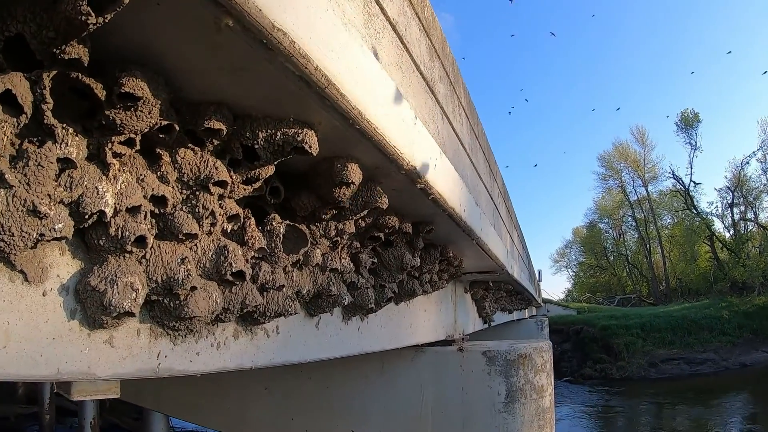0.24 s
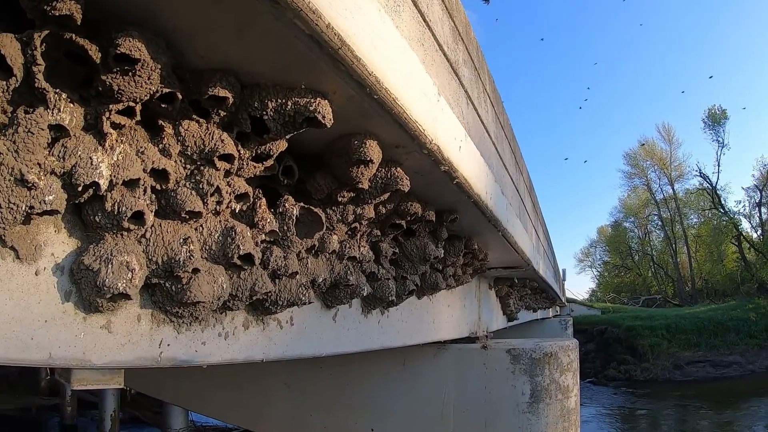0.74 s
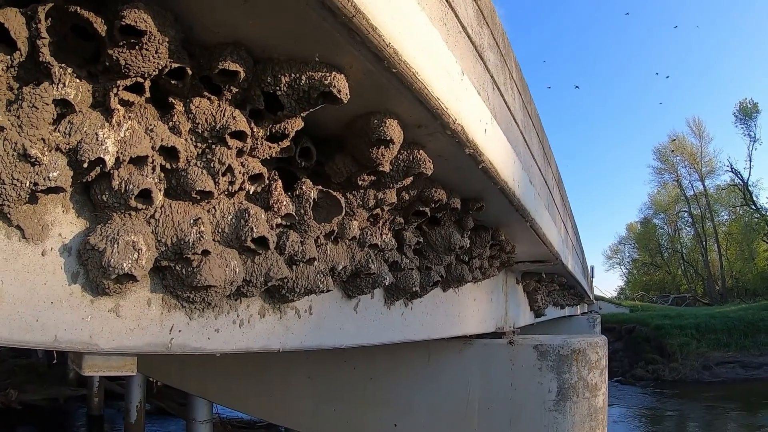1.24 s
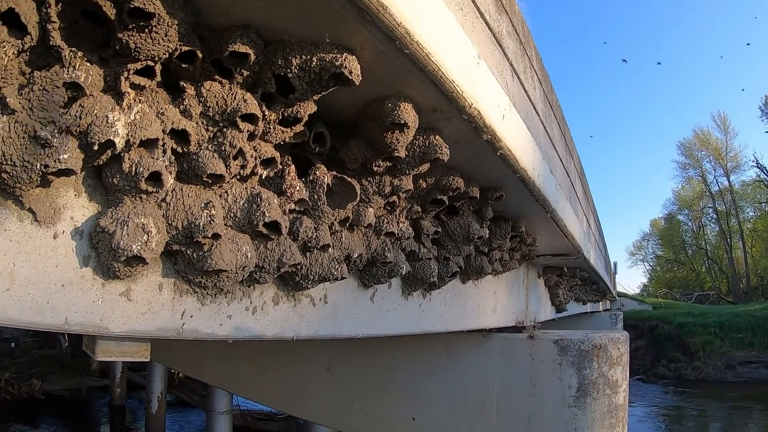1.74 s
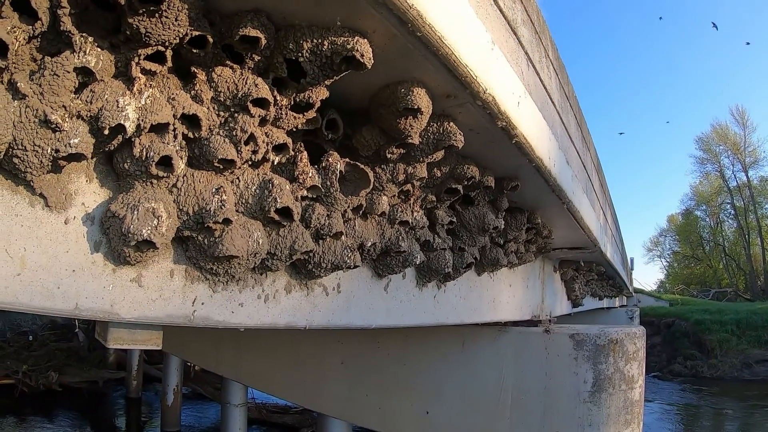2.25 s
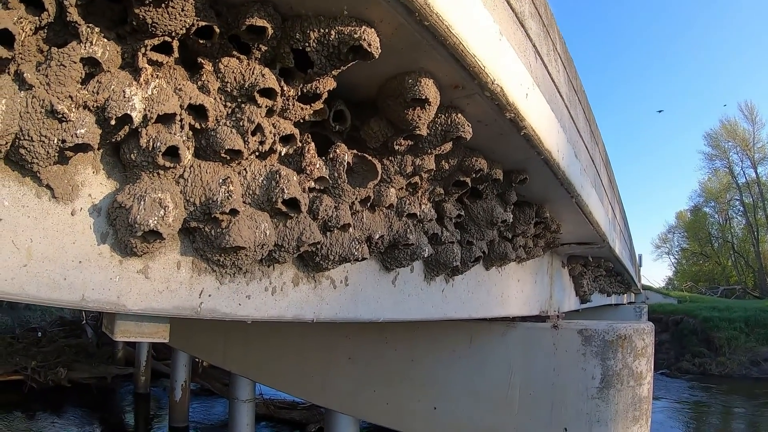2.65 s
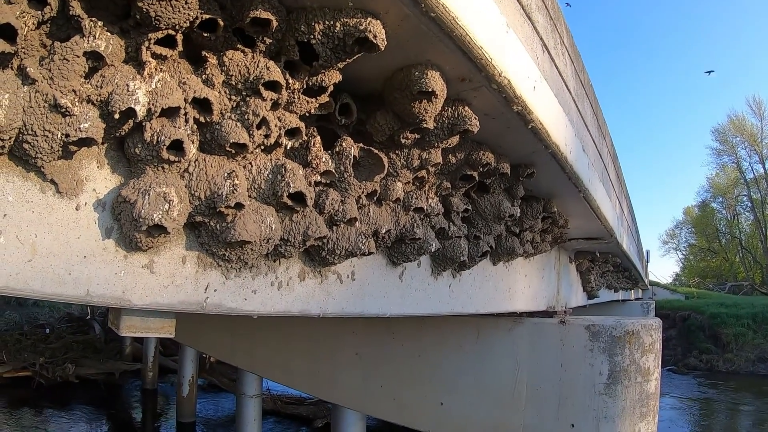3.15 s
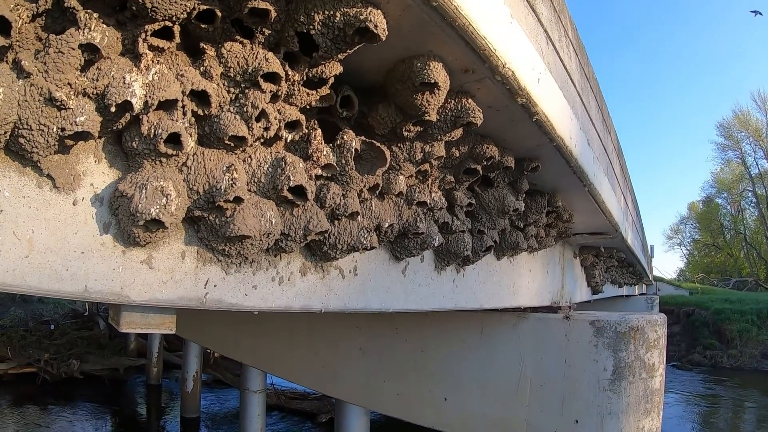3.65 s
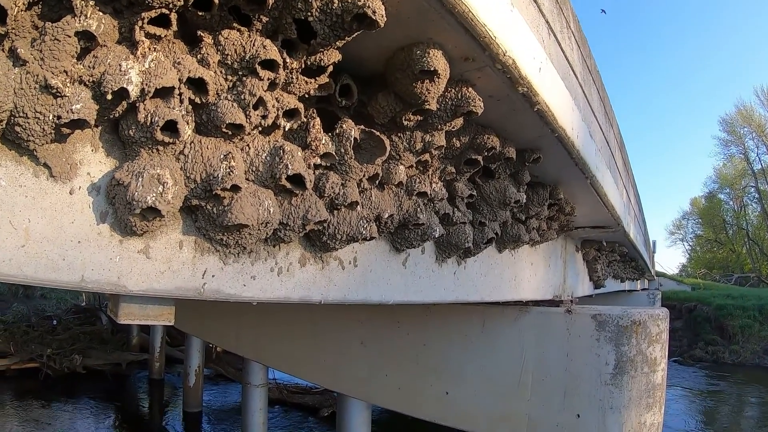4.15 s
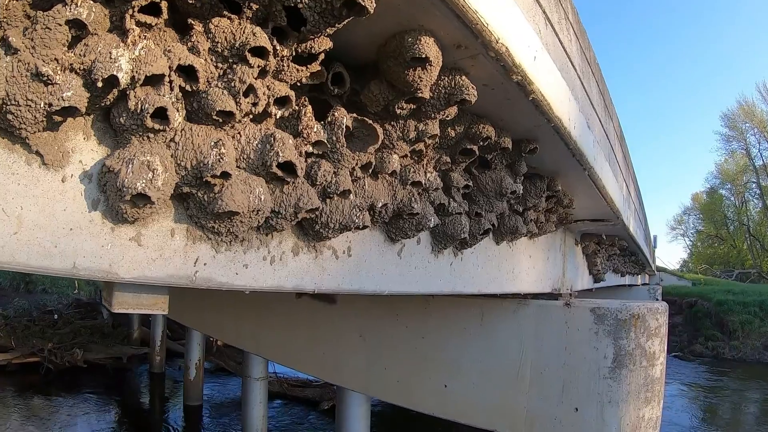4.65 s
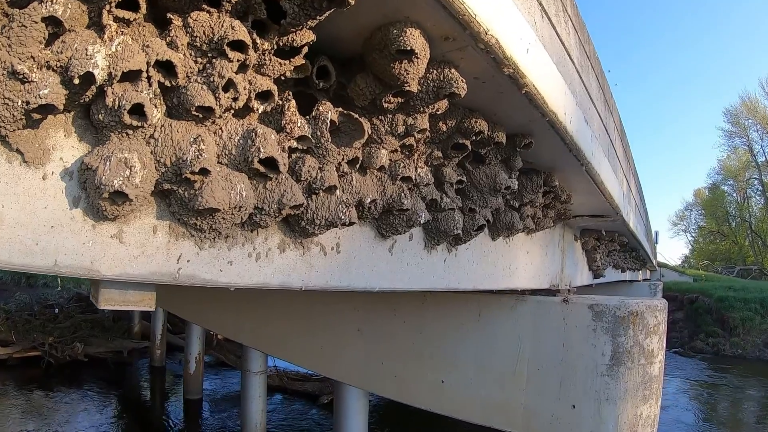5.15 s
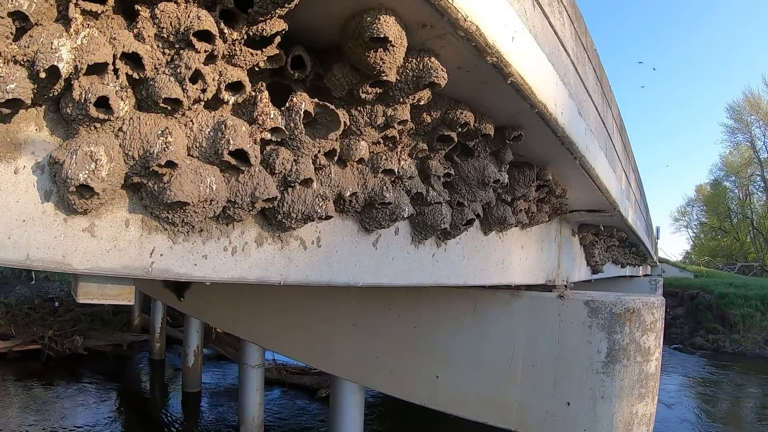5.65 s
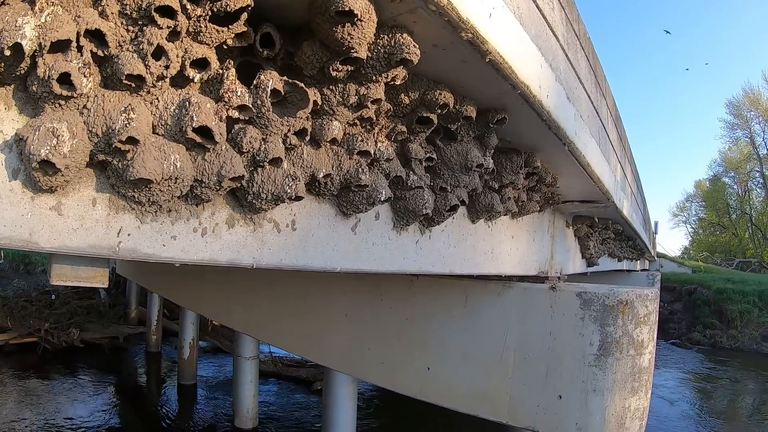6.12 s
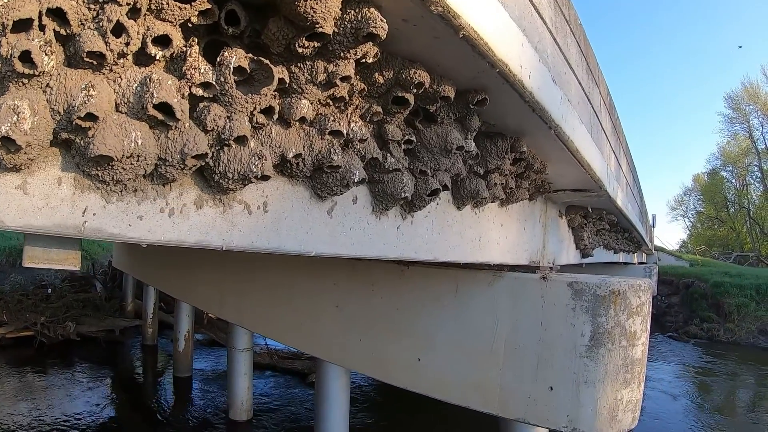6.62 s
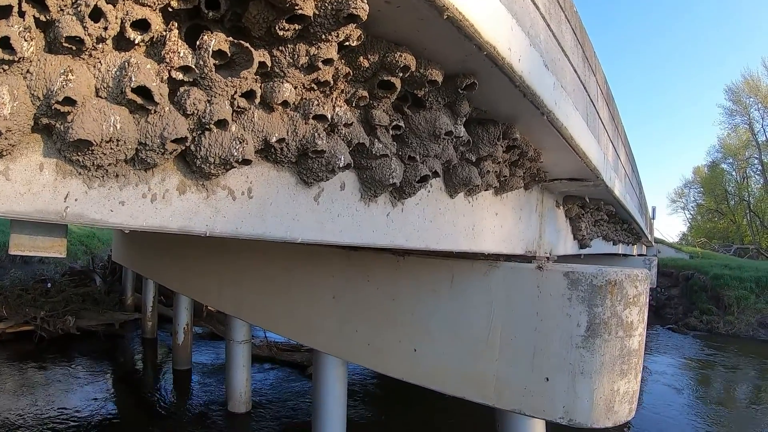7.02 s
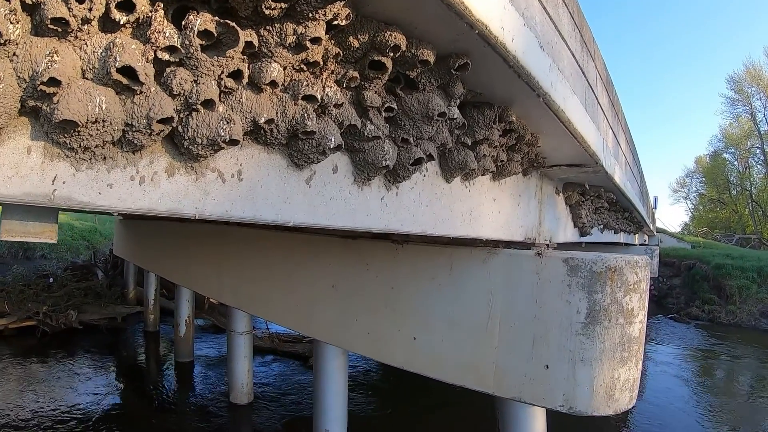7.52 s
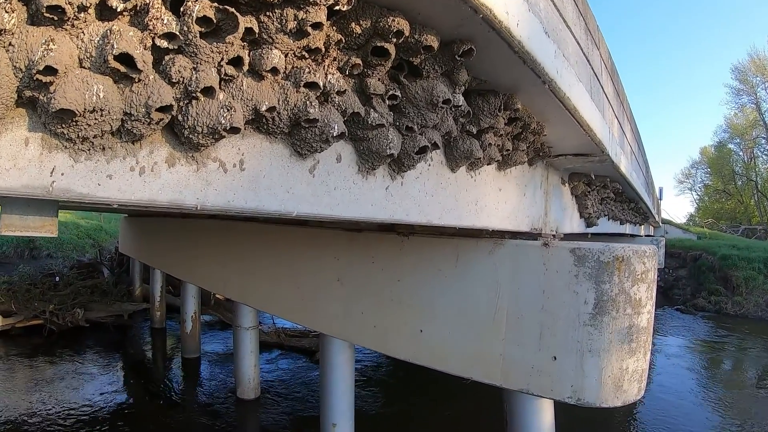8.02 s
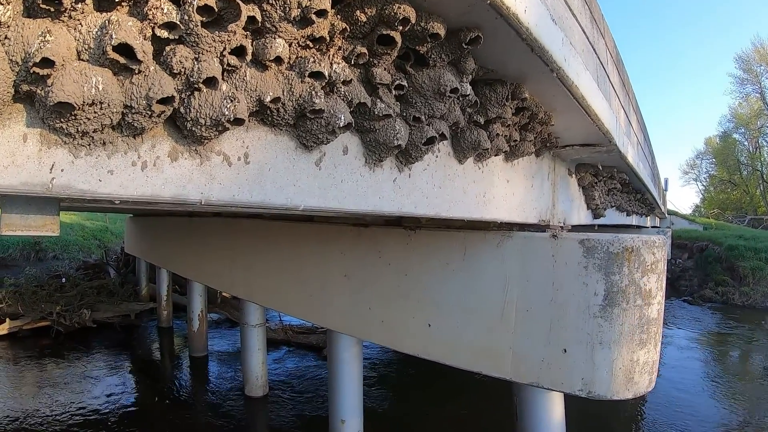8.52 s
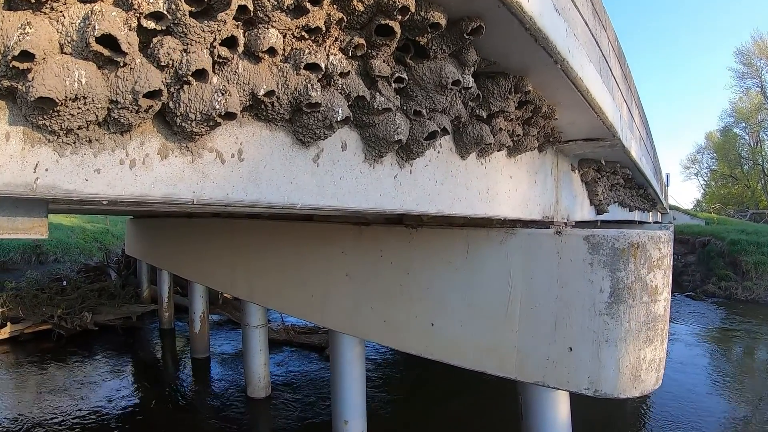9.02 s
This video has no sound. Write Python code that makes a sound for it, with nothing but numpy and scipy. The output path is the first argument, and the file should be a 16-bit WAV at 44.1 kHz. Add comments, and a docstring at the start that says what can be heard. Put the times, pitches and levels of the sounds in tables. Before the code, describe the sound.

From 0 to about 9.3 seconds, a swallow colony under a concrete bridge keeps up a dense, unbroken chorus of short, raspy, falling cries, gently swelling and easing, blurred by brief hard reflections from deck and water. Single nearer birds stand out several times a second, each a creaky, nasal, two-toned chirr of 0.1 to 0.35 seconds, scattered left and right. Small dry ticks fall at 0.4 and, clearer, 0.7. Rougher or stronger cries come around 2.6, 3.5, 4.0 and 5.1. At 6.3 to 6.55 a very close squeal steps down, then plunges and breaks off; at 7.8 to 8.1 a close screech leaps up and sinks away. Barely audible low hoots, steady quiet river wash and soft low wind gusts, near 2.3 and 7.8, lie underneath. Stereo microphone close to the nests, outdoors, with no extreme treble.

```python
"""Harsh, falling cries of swallows ring out from mud nests under a concrete bridge, beside a river.
Each cry is two voices, one from each side of the syrinx, working one air valve and shaped by throat and beak.
A squeal and a screech stand out closest, then single near birds, then a dense chorus echoing under the deck.
Behind them are faint low hoots and two dry ticks of narrow noise, and coloured noise for water and light wind.
"""
import sys
import numpy as np
from scipy import signal
from scipy.fft import rfft, irfft
from scipy.io import wavfile
from scipy.ndimage import uniform_filter1d

SR = 44100
rng = np.random.default_rng(int(sys.argv[2]) if len(sys.argv) > 2 else 0)


def to_wav(s):
    """Save 16-bit WAV."""
    ch = np.atleast_2d(s).T  # columns
    pcm = np.round(np.clip(ch, -1, 1) * 32767)  # PCM
    wavfile.write(sys.argv[1], SR, pcm.astype(np.int16))


N = 408807
HZ = np.fft.rfftfreq(N, 1 / SR)
TIME = np.arange(N) / SR

# The two closest birds, each one long cry drawn as a curve:
# (time [s], low voice [Hz], high voice [Hz], level [dB], roughness [0-1])
# a squeal: the voices lock two to three, step down, then plunge and break off
SQUEAL = [(6.31, 1017, 1512, -48, 0.5), (6.365, 996, 1500, -33, 0.34), (6.4, 960, 1462, -33.5, 0),
          (6.43, 888, 1340, -31, 0.12), (6.465, 891, 1315, -29.5, 0.16), (6.5, 832, 1254, -33, 0.2),
          (6.53, 773, 1155, -31, 0.05), (6.558, 653, 1013, -40, 0)]
# a screech: both voices leap up, the high one falls while the low one arches, and both sink away at the end
SCREECH = [(7.826, 750, 1500, -43, 0.24), (7.858, 926, 1790, -30, 0.37), (7.89, 965, 1660, -32, 0.2),
           (7.925, 975, 1490, -30, 0.28), (7.955, 926, 1385, -28.5, 0.21), (8, 843, 1230, -30.5, 0.28),
           (8.06, 779, 1170, -32.5, 0.27), (8.125, 676, 1000, -38, 0.32)]
# How each closest bird sings its curve: (curve, strength of high voice [ratio], valve drive [1 mellow, 4 shrill],
# beak resonance [Hz], extra treble [dB], left-right [dB])
CLOSEST = [(SQUEAL, .8, 1.7, 2000, 8, 6), (SCREECH, .36, 3.4, 2750, 8, -2.9)]


def closest_birds(taper=0.039):
    """The squeal and the screech: both voices of the syrinx follow drawn curves of pitch, level and roughness."""
    out = np.zeros((2, N))
    for curve, share, drive, beak_hz, treble_db, pan_db in CLOSEST:
        s, *columns = np.transpose(curve)
        t = np.arange(0, s[-1] - s[0], 1 / SR)
        low_hz, high_hz, db, rough = (np.interp(s[0] + t, s, column) for column in columns)
        swell = gain_of(db) * signal.windows.tukey(len(t), taper)
        cry = swell * syrinx(t, low_hz, high_hz, share, drive, rough)
        level = np.sqrt(np.mean(swell ** 2))  # through_beak evens the cry, so its level is put back
        add(out, s[0], level * through_beak(cry, beak_hz, pan_db, treble_db))
    return out


# Single near cries: (time [s], length [s], low voice at start [Hz], its fall [share of pitch],
# high voice at start [Hz], its fall [share of pitch], strength of high voice beside low [ratio],
# valve drive [1 mellow, 4 shrill], level [dB], loudest point [0-1 of length], roughness [0-1],
# beak resonance [Hz], left-right [dB])
CALLS_NEAR = [(-0.021, 0.18, 846, 0.16, 1293, 0.039, 2.6, 1.1, -37, 0.052, 0.4, 1730, 0),
              (0.555, 0.22, 932, 0.17, 1307, 0.15, 0.18, 1.9, -48, 0.86, 0.2, 3000, 15),
              (0.745, 0.35, 1017, 0.44, 1161, 0.24, 0.84, 1.9, -39.5, 0.2, 0.28, 1710, 3.5),
              (1.01, 0.31, 934, 0.41, 1484, 0.33, 0.53, 1.4, -42, 0.71, 0.3, 1300, 2),
              (1.241, 0.29, 1067, 0.31, 1672, 0.25, 0.22, 4.3, -41.5, 0.45, 0.35, 2739, 8),
              (1.534, 0.19, 936, 0.13, 1755, 0.15, 0.64, 2.2, -39.5, 0.25, 0.26, 2720, 6.5),
              (1.755, 0.19, 895, 0.3, 1230, 0.2, 2.4, 1.6, -37.5, 0.26, 0.27, 1800, 4),
              (1.91, 0.17, 1034, 0.28, 1674, 0.37, 0.67, 1.9, -42, 0.5, 0.21, 2300, 3),
              (2.155, 0.25, 672, 0.41, 1028, 0.11, 0.32, 1.2, -43, 0.55, 0.41, 1700, 9.5),
              (2.56, 0.28, 885, 0.15, 1556, 0.11, 0.36, 1.2, -38, 0.52, 0.55, 1980, -0.5),
              (3.16, 0.34, 1056, 0.16, 1890, 0.33, 0.51, 2.4, -39.5, 0.14, 0.33, 1670, -7),
              (3.5, 0.22, 820, 0.17, 1524, 0.23, 0.5, 2.4, -36.5, 0.4, 0.32, 1290, -8),
              (3.785, 0.1, 939, 0.092, 1250, 0.12, 0.9, 1.4, -39.5, 0.5, 0.08, 2150, -5),
              (3.865, 0.13, 1180, 0.16, 1850, 0.17, 0.65, 1.5, -51, 0.44, 0.2, 2900, -2),
              (3.96, 0.23, 1078, 0.07, 1700, 0.18, 0.048, 5.4, -35.5, 0.54, 0.2, 1860, 7),
              (4.45, 0.31, 887, 0.47, 1408, 0.48, 0.62, 2.2, -37.5, 0.87, 0.43, 1690, -5),
              (4.725, 0.18, 1016, 0.069, 1487, 0.19, 2, 0.55, -40.5, 0.11, 0.5, 2580, -1),
              (5.054, 0.135, 933, 0.3, 1230, 0.0498, 2.7, 1.3, -36, 0.43, 0.18, 1980, 3),
              (5.128, 0.17, 1194, 0.35, 1908, 0.36, 0.77, 1.1, -42, 0.61, 0.37, 2320, -6),
              (5.586, 0.28, 819, 0.27, 1174, 0.28, 0.78, 3.3, -42.5, 0.47, 0.4, 1420, -7),
              (5.939, 0.31, 800, 0.32, 1339, 0.37, 2.9, 0.88, -37.5, 0.45, 0.27, 1990, -8.5),
              (6.68, 0.24, 910, 0.16, 1465, 0.18, 0.4, 4.6, -44, 0.2, 0.22, 1480, -5.5),
              (7.06, 0.25, 1029, 0.019, 1660, 0.047, 0.18, 1.8, -37, 0.62, 0.67, 1590, -7),
              (8.09, 0.18, 847, 0.4, 1209, 0.14, 1.6, 3.3, -39, 0.13, 0.3, 2150, 5),
              (8.321, 0.16, 905, 0.47, 1258, 0.26, 2, 1.5, -41.5, 0.097, 0.21, 2150, -4),
              (8.419, 0.14, 1031, 0.24, 1640, 0.18, 3.1, 1.4, -42, 0.63, 0.31, 1960, 7),
              (8.716, 0.27, 840, 0.33, 1300, 0.22, 2.3, 0.75, -39, 0.77, 0.53, 1900, 3),
              (9.02, 0.17, 1000, 0.23, 1473, 0.2, 0.5, 1.1, -43, 0.34, 0.16, 2330, 8),
              (9.205, 0.26, 1069, 0.05, 1240, 0.22, 0.4, 11.5, -45.5, 0.46, 0.17, 4760, 5)]


def near_birds():
    """Single birds close by: each gives one falling cry through its own beak."""
    out = np.zeros((2, N))
    for s, *voices, db, crest, rough, beak_hz, pan_db in CALLS_NEAR:
        cry = falling_cry(*voices, crest, rough)
        add(out, s, gain_of(db) * through_beak(cry, beak_hz, pan_db))
    return out


BEND = 1.3  # a falling cry holds its pitch at first, then falls ever faster, as this power of time
END_SAG = 0.052  # share by which the pitch drops in the last moment, as the air runs out


def falling_cry(length, low_hz, low_fall, high_hz, high_fall, share, drive, crest, rough,
                edge_db=-7, taper=0.14):
    """The common cry: both voices glide down while it swells and fades."""
    t = np.arange(int(length * SR)) / SR
    u = t / length
    sag = 1 - END_SAG * u ** 20
    low = low_hz * (1 - low_fall * u ** BEND) * sag
    high = high_hz * (1 - high_fall * u ** BEND) * sag
    swell_db = np.interp(u, [0, np.clip(crest, .05, .95), 1], [edge_db, 0, edge_db])
    swell = gain_of(swell_db) * signal.windows.tukey(len(t), taper)
    return swell * syrinx(t, low, high, share, drive, rough)


JITTER, WOBBLE = .035, .03  # quick and slow unsteadiness of a fully rough voice, as shares of its pitch
RATTLE_PER_S, RATTLE_DEPTH = 95, .7  # a rough voice breaks into quick pulses
TUNED = .3  # a bird tunes its throat to the sum of its two pitches, which sings out by up to this much


def syrinx(t, low_hz, high_hz, share, drive, rough, rasp=0.87, flutter=0.54):
    """Two voices work one air valve, which also lets through a rasp of air; rough stretches rattle."""
    rough = np.clip(rough, 0, 1)

    def phase(hz):
        unsteady = 1 + rough * (JITTER * waver(t, 498) + WOBBLE * waver(t, 70.6))
        return 2 * np.pi * np.cumsum(hz * unsteady) / SR

    low, high = phase(low_hz), phase(high_hz)
    # the valve opens steeply: the harder it is driven, the more overtones and sums of the two pitches it makes
    flow = np.exp(drive * (np.cos(low) + share * np.cos(high)))
    sum_tone = TUNED * min(share, 1) * np.cos(low + high)
    voices = evened(evened(flow - flow.mean()) + sum_tone)
    hiss = rng.standard_normal(len(t)) * np.sqrt(flow)
    air = evened(signal.lfilter([1], [1, -.75], hiss))  # tilts the hiss darker
    rattle = np.sin(2 * np.pi * np.cumsum(RATTLE_PER_S * (1 + .3 * waver(t, 60))) / SR)
    pulses = 1 + RATTLE_DEPTH * rough * rattle
    flutters = np.exp(flutter * rough * waver(t, 150))
    return flutters * pulses * ((1 - rough) * voices + rasp * rough * air)


def beak(hz, centre_hz, beak_db=8, beak_octaves=0.51):
    """Gain of the open beak: one broad resonance."""
    octaves_off = np.log2((hz + 1) / centre_hz)
    return gain_of(beak_db * np.exp(-.5 * (octaves_off / beak_octaves) ** 2))


SIDE_S_PER_DB = .000004  # a bird off to one side reaches the nearer port sooner
THROAT_DELAY_S_PER_HZ = .000002  # the throat delays higher overtones more, which rounds the pulses
RING_S = .025  # and rings on briefly after the cry
# Tone of the throat: (frequency [Hz], gain [dB])
THROAT = [(300, -49), (500, -20), (750, -7), (1400, -0.5), (2100, 3.5), (2800, -1.5), (3600, -4.5),
          (4400, -5.5), (5100, -1), (6000, -13), (7500, -26)]


def through_beak(cry, beak_hz, pan_db, treble_db=0):
    """Throat and open beak colour a cry on its way to both ports, brighter if the bird faces them; rms about one."""
    hz = np.fft.rfftfreq(SR, 1 / SR)
    side_db = np.array([[pan_db], [-pan_db]]) / 2
    arrival = np.exp(2j * np.pi * hz * (SIDE_S_PER_DB * side_db - THROAT_DELAY_S_PER_HZ * hz / 2))
    facing_db = treble_db * np.interp(hz, [3000, 7000], [0, 1])
    tone = gain_of(read(THROAT, hz) + facing_db) * beak(hz, beak_hz)
    sung = irfft(rfft(cry, SR) * tone * arrival, SR)[:, :len(cry) + int(RING_S * SR)]
    return gain_of(side_db) * evened(sung)


def bridge(x, t60=.45):
    """Dense reflections between deck, pier and water: sparse random taps that die away, different at each port."""
    t = np.arange(SR // 2) / SR
    hits = rng.random((2, len(t))) < .06
    taps = rng.standard_normal((2, len(t))) * hits * (t > .004) * gain_of(-60 * t / t60)
    taps = taps / np.linalg.norm(taps, axis=1, keepdims=True)
    return signal.oaconvolve(x[None], taps, axes=1)[:, :N]


COLONY_ROUGH, COLONY_T60 = .3, .4  # average roughness [0-1], decay of the echo [s]
# Swell of the birds further along, before the overall trim: (time [s], level [dB])
CHORUS = [(0, -32.5), (.5, -35), (1.1, -34), (2.3, -32), (3.1, -32), (3.8, -33), (4.3, -33), (4.97, -35.5),
          (5.25, -33.5), (5.5, -35.5), (6.2, -32), (6.58, -33), (6.8, -34), (7.5, -33.5), (7.78, -36),
          (8.15, -33.5), (8.6, -35.5), (9.27, -34.5)]
# Spectrum of the chorus, relative: (frequency [Hz], level [dB per Hz])
CHORUS_COLOUR = [(350, -42.5), (500, -25), (650, -17.5), (900, -7), (1150, -7.5), (1550, 0.9), (2100, -0.4),
                 (2700, -8), (3100, -16), (4400, -26), (5100, -26.5), (5850, -37.5), (7000, -42.5),
                 (8000, -64.5)]


def colony(count=400, pitch_hz=960, spread=.24, fall=.24, drive=2.77, range_db=7, wet_db=1, level_db=-0.42):
    """Hundreds of like cries from six clusters of nests, each with its own echo under the bridge."""
    clusters = np.zeros((6, N))
    chances = rng.random((count, 10))
    for i, (when, long, high, steep, steep_high, far, gap, share, harsh, crest) in enumerate(chances):
        first_hz = pitch_hz * (1 + spread * (2 * high - 1))
        cry = falling_cry(.09 + .15 * long, first_hz, fall * (0.2006 + 1.6 * steep),
                          first_hz * (1.3 + .5 * gap), fall * (steep + steep_high),
                          0.53 + share, drive, crest, COLONY_ROUGH * (.5 + harsh))
        start_s = (i + when) / count * (N / SR + .3) - .3
        add(clusters[i % len(clusters)], start_s, gain_of(-range_db * far) * cry)
    direct = np.array([clusters[::2].sum(0), clusters[1::2].sum(0)])
    echo = sum(bridge(cluster, t60=COLONY_T60) for cluster in clusters) / np.sqrt(2)
    chorus = coloured(direct + gain_of(wet_db) * echo, CHORUS_COLOUR)
    # so many birds never leave a gap: the chorus swells only as the whole colony does
    loudness = np.sqrt(abs(uniform_filter1d((chorus ** 2).mean(0), size=SR // 4)) + 1e-9)
    return gain_of(level_db) * follow(CHORUS) * ports(chorus / loudness)


# Faint low hoots far off: (time [s], length [s], pitch [Hz], peak level [dB])
HOOTS = [(0.201, 0.6, 389, -60.5), (0.48, 0.28, 310.5, -54.5), (1.452, 0.26, 335, -61.5),
         (2.091, 0.53, 367, -63), (6.28, 0.21, 297, -60), (8.65, 0.2, 182, -59.5), (8.799, .35, 400, -60)]
# Small dry ticks: (time [s], centre [Hz], level at onset [dB])
TICKS = [(.424, 5640, -56), (0.671, 4120, -41)]


def small_sounds(hoot_width=60, tick_width=1600, tick_t60=0.038):
    """Fuzzy far hoots and quick dry ticks: narrow noise that swells and fades, or dies at once."""
    out = np.zeros((2, N))
    for s, length, hz, db in HOOTS:
        t = np.arange(int(length * SR)) / SR
        swell = gain_of(db) * np.sin(np.pi * t / length)
        add(out, s, swell * narrow_noise(t, hz, hoot_width))
    t = np.arange(SR // 20) / SR
    for s, hz, db in TICKS:
        decay = gain_of(db - 60 * t / tick_t60)
        add(out, s, decay * np.array([narrow_noise(t, hz, tick_width) for _ in out]))
    return out


BREEZE_DB = -67.5  # the steady breeze beneath the gusts, before its lumps and puffs
# Spectrum of the water, relative: (frequency [Hz], level [dB per Hz])
RIVER = [(25, -5), (55, -12.5), (80, 3.5), (130, -4), (220, -4.5), (340, 0), (500, -3), (1000, -1),
         (3000, -31), (7000, -61)]
# Spectrum of wind on the microphone, relative: (frequency [Hz], level [dB per Hz])
WIND_COLOUR = [(15, 3.5), (45, -2), (90, -1.5), (160, -16), (300, -21.5), (800, -54)]
# Gusts, before lumps and puffs: (time [s], length [s], peak level [dB])
GUSTS = [(1.843, 1.01, -52), (3.1, .4, -62.5), (5.305, 0.6, -65), (6.284, .26, -58), (7.103, 1.5, -55)]


def river_and_wind(river_db=-58, lumps_db=5, puffs_db=2.5, puffs_per_s=7):
    """A steady wash of water, and a lumpy breeze that swells and dies away in each gust."""
    water = gain_of(river_db) * coloured(rng.standard_normal((2, N)), RIVER)
    strength = gain_of(BREEZE_DB)
    for s, length, db in GUSTS:
        progress = np.clip((TIME - s) / length, 0, 1)
        strength = strength + gain_of(db) * np.sin(np.pi * progress) ** 2
    uneven_db = lumps_db * np.tanh(waver(TIME, 27)) + puffs_db * np.tanh(waver(TIME, puffs_per_s))
    wind = strength * gain_of(uneven_db) * coloured(rng.standard_normal((2, N)), WIND_COLOUR)
    return ports(water + wind)


# How alike the two microphone ports hear a diffuse sound: (frequency [Hz], likeness [0-1])
LIKENESS = [(60, .75), (300, .45), (550, .35), (1000, .48), (1600, .64), (2100, .64), (2700, .33),
            (4000, .25), (7500, .35)]
# How far the left port leads: (frequency [Hz], phase [rad])
LEAD = [(0, 0), (1000, .08), (1600, .17), (2100, .28), (2700, .55), (4300, 1.9), (7750, 4.6)]


def ports(pair):
    """Two unrelated signals become the partly alike signals at the two microphone ports."""
    a, b = rfft(pair)
    same = np.clip(read(LIKENESS, HZ), 0, 1)
    right = (same * a + np.sqrt(1 - same ** 2) * b) * np.exp(-1j * read(LEAD, HZ))
    return irfft(np.array([a, right]), N)


def gain_of(db):
    """Decibels to amplitude."""
    return 10 ** (np.asarray(db) / 20)


def evened(x):
    """Scales to an rms of one."""
    return x / np.sqrt(np.mean(x ** 2) + 1e-20)


def read(points, hz):
    """Reads a table on a log-frequency axis."""
    f, value = np.transpose(points)
    return np.interp(np.log(hz + 1), np.log(abs(f) + 1), value)


def follow(curve):
    """A level curve as a gain for every sample."""
    return gain_of(np.interp(TIME, *np.transpose(curve)))


def coloured(x, spectrum):
    """Gives a sound the broad shape of a spectrum and keeps its fine lines; rms one."""
    z = rfft(x)
    broad = np.sqrt(abs(uniform_filter1d((abs(z) ** 2).mean(0), size=1500)) + 1e-6)
    return evened(irfft(z / broad * gain_of(read(spectrum, HZ)), N))


def add(mix, s, sound):
    """Adds a sound into the mix at time s, trimmed at both ends of the scene."""
    start = round(s * SR)
    sound = sound[..., max(-start, 0):]
    part = mix[..., max(start, 0):][..., :sound.shape[-1]]
    part += sound[..., :part.shape[-1]]


def waver(t, per_s):
    """Smooth chance that takes a new value per_s times a second."""
    return np.interp(t * per_s, np.arange(1024), rng.standard_normal(1024))


def narrow_noise(t, hz, width):
    """Noise in a narrow band around hz: a carrier whose amplitude and phase wander width times a second."""
    wander = waver(t, width) + 1j * waver(t, width)
    return evened((wander * np.exp(2j * np.pi * hz * t)).real)


ECHO_DB = -11  # echo of the closest birds beside their direct sound
FARTHER_ECHO_DB = -6  # the other near birds sit deeper under the deck


def scene():
    """Closest and near birds with their echo, over the colony, the small sounds, the river and the wind."""
    closest, near = closest_birds(), near_birds()
    left_leads = np.exp(-1j * np.outer([0, 1], read(LEAD, HZ)))
    direct = irfft(rfft(closest + near) * left_leads, N)
    into_deck = (gain_of(ECHO_DB) * closest + gain_of(FARTHER_ECHO_DB) * near).mean(0)
    echo = ports(bridge(into_deck, t60=0.18))
    return direct + echo + colony() + small_sounds() + river_and_wind()


EDGE_HZ = 7800


def record(dry):
    """The recorder's band limit: a steep low-pass at EDGE_HZ."""
    lowpass = signal.firwin(301, EDGE_HZ, window=("kaiser", 8), fs=SR)
    return signal.oaconvolve(dry, lowpass[None], "same")


dry = scene()
out = record(dry)
to_wav(out)
```